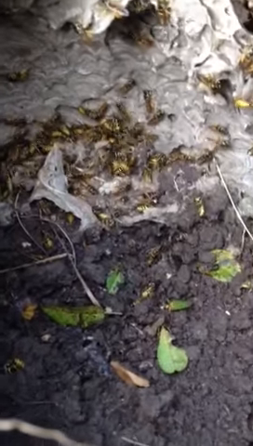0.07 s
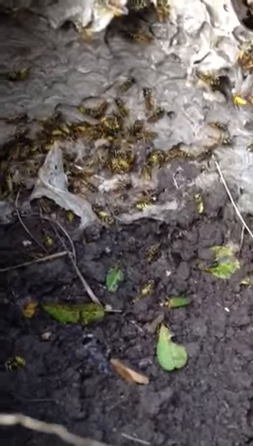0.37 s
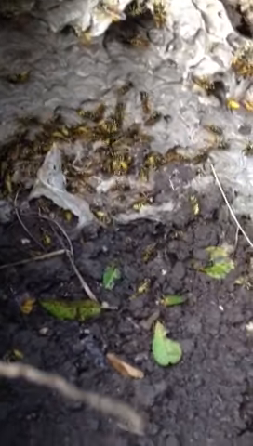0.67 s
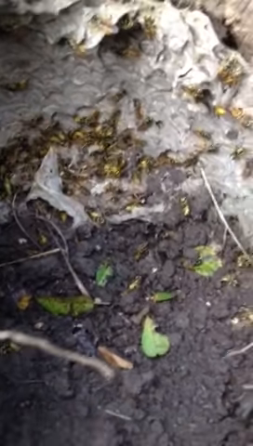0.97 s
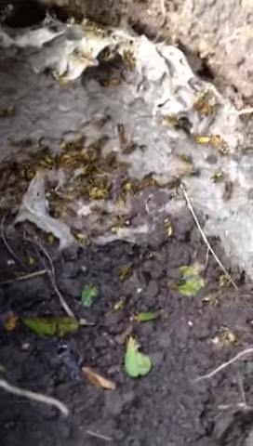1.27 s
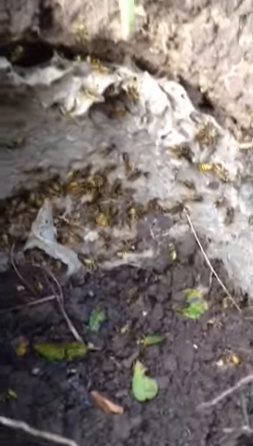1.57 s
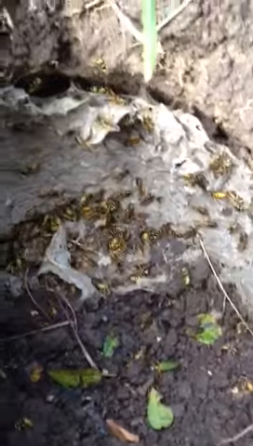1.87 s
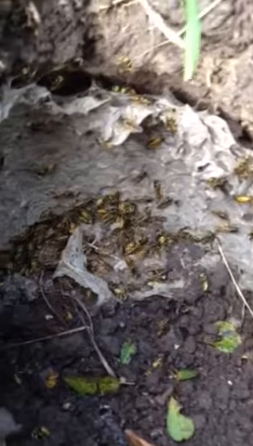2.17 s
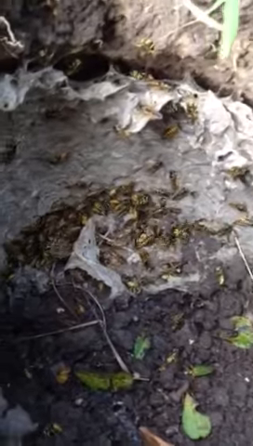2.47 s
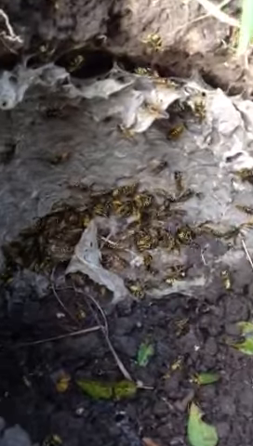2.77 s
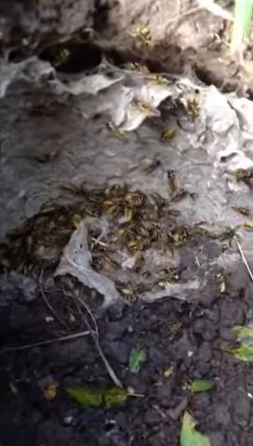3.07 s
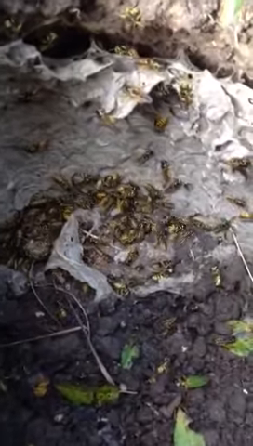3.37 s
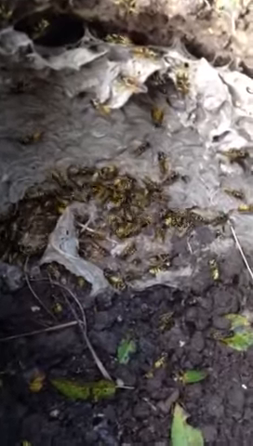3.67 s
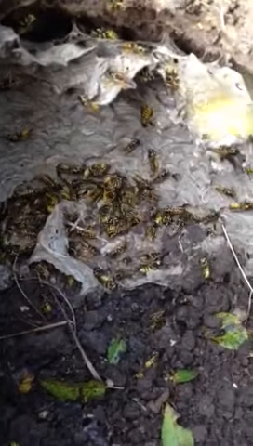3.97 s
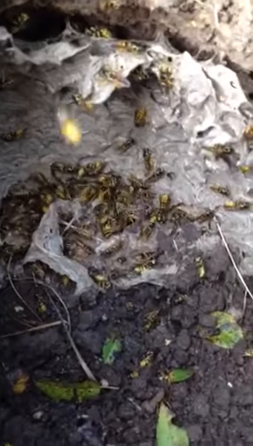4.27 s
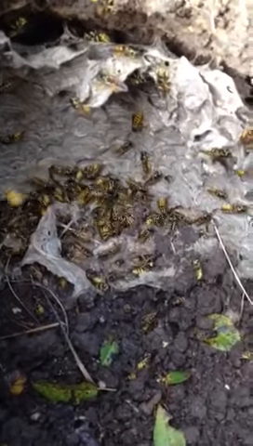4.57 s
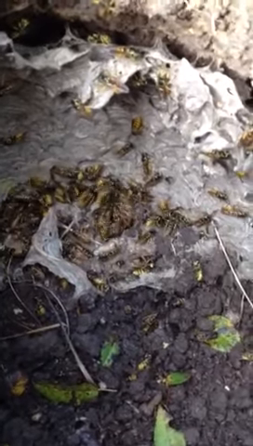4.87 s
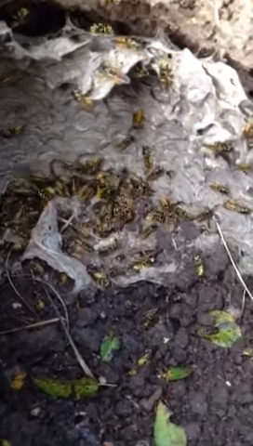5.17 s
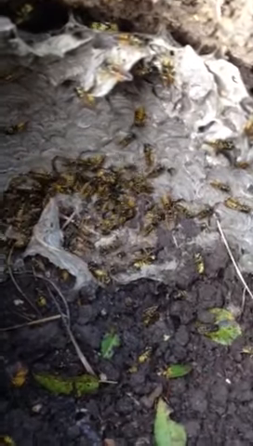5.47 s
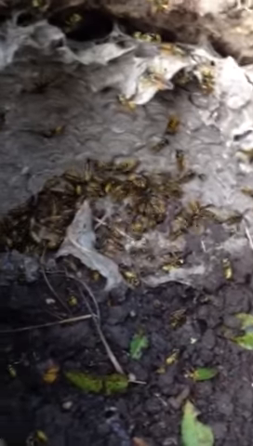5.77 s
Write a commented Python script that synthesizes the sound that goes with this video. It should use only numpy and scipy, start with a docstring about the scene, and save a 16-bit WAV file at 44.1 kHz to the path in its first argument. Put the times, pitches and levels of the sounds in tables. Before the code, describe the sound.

Wasps buzz around an open nest outdoors, with one sudden close pass, quieter hovering and tiny crawling ticks.

```python
"""Wasps buzz at an open paper nest in a hollow of soil, each wingbeat making low tones and a rasp.
One flies right past the microphone, fans it and seems to clip it with a wing; a second comes in
and hovers while others swerve by or land. Under them the colony hums, crawling wasps tick and rustle
on the paper, crumbs of soil drop on the nest, and thin falling chirps come from far off."""
import sys
import numpy as np
from scipy import signal
from scipy.fft import rfft, irfft, next_fast_len
from scipy.io import wavfile
from scipy.ndimage import uniform_filter1d, minimum_filter1d

SR = 44100
rng = np.random.default_rng(int(sys.argv[2]) if len(sys.argv) > 2 else 0)


def put_to_file(sound):
    """Save the sound as 16-bit audio at rate SR, in the file named by the first command-line argument."""
    columns = np.atleast_2d(sound).T  # one column per channel
    safe = np.clip(columns, -1, 1)
    whole_steps = np.round(safe * 32767)
    wavfile.write(sys.argv[1], SR, whole_steps.astype(np.int16))


N = 265041
T = np.arange(N) / SR

# Wing strokes per second, two to a wingbeat: time_s, stroke_hz
PASS_STROKES = [(0.0, 266.9), (0.066, 253.5), (0.12, 279.2), (0.194, 279.8), (0.308, 248.7), (0.354, 294.5),
                (0.386, 274.1), (0.522, 285.9), (0.642, 267.8), (0.776, 276.1), (0.986, 255.3),
                (1.056, 267.6), (1.09, 231.3), (1.228, 270.4), (1.4, 261.1)]
HOVER_STROKES = [(3.1, 270.1), (3.13, 271.9), (4.27, 272.6), (4.48, 278.6), (5.21, 276.7), (5.34, 264.9),
                 (5.43, 269.8), (5.94, 272.7), (6.0, 276.8)]
# Overtones of the wingbeat: multiple, level_db
PASS_OVERTONES = [(3, 2.5), (4, -8), (5, -1), (6, -2.5), (7, -1.5), (8, -5), (9, -10.5), (10, -11),
                  (11, -15), (12, -18.5), (13, -19.5), (14, -24), (15, -19)]
HOVER_OVERTONES = [(3, 1), (4, -11.5), (5, -11), (6, -12.5), (7, -15.5), (8, -12.5), (9, -15.5),
                   (10, -17.5), (11, -16.5), (12, -25), (13, -29)]
FLYBY_OVERTONES = [(3, 6), (4, 6), (5, 8.5), (6, 7), (7, 6), (8, -14), (9, 3), (10, -3), (11, 0), (12, -2),
                   (13, -22)]
# The passing wasp nears and leaves, its tone changing as it turns:
# time_s, stroke_db, beat_offset_db, treble_offset_db (offsets add to stroke_db)
APPROACH = [(0.0, -51, -36, -16), (0.068, -57, -6, -10.5), (0.124, -55, 6, 1), (0.326, -54.5, 4.5, -11),
            (0.392, -34, -8.5, -16), (0.433, -19, -5.5, -11.5)]
RETREAT = [(0.525, -17, -2.5, -19.5), (0.537, -32.5, 0, -13), (0.575, -49, 11.5, -5),
           (0.679, -43, -8.5, -13), (0.883, -57, -11.5, -9.5), (0.941, -65, -3, -7.5), (1.075, -64, -9, -6),
           (1.125, -74, 1.5, -16.5), (1.255, -63.5, -31, -8.5), (1.41, -72, -12, -4)]
# The tone of each noise, from low to high: frequency_hz, relative_db
EDDY_SPECTRUM = [(80, -32.5), (160, -3), (330, 0.5), (600, -0.5), (1000, -5), (1500, -15.5), (3000, -41.5)]
RASP_SPECTRUM = [(700, -15.5), (1500, -1.5), (2100, 2), (3000, -4), (4500, -10.5), (7500, -15.5),
                 (10000, -25), (15000, -27.5)]
RUSTLE_SPECTRUM = [(700, -21.5), (1800, -6), (4000, -0.5), (7000, -5), (9700, -11), (13000, -7.5),
                   (15000, -11)]
AIR_SPECTRUM = [(25, -10.5), (70, -15), (105, -4), (150, -4.5), (220, -1.5), (350, -5.5), (600, -9),
                (1300, -11.5), (2500, -16), (4800, -19.5), (7400, -14.5), (9700, -26), (12500, -18),
                (15000, -14)]
TICK_SPECTRUM = [(300, -9.5), (1500, -5.5), (3500, 1.5), (5000, -7.5), (7000, 1.5), (9500, -6),
                 (14000, 3.5)]
GUST_SPECTRUM = [(25, -36.5), (80, -39.5), (125, -12), (170, 10), (230, 1), (330, -1.5), (480, 2),
                 (800, -7.5), (1300, -23.5), (2000, -27), (4000, -46.5), (15000, -72.5)]
SWISH_SPECTRUM = [(300, -5), (1500, -1.5), (3000, -3.5), (5000, -8.5), (7700, -4), (10000, -13.5),
                  (15000, -9.5)]
# Wasps fanning inside the nest: pitch_hz, level_db
COLONY_HUMS = [(147.46, -85), (149.3, -85), (156, -75.5), (175.3, -75.5), (132, -80)]
# Faint chirps: start_s, level_db
CHIRPS = [(0.018, -64.5), (.125, -61.5), (.21, -65), (.295, -63), (0.824, -68.5), (.992, -69.5),
          (2.492, -60.5), (2.579, -65), (2.703, -67.5), (2.99, -70), (3.15, -68.5)]
# Legs and jaws on paper: start_s, peak_db, body_boost_db, treble_boost_db, decay_s
TICKS = [(1.0955, -41.5, -6, -1, 0.046), (1.2162, -34, 0, -1.5, 0.013), (1.7255, -44.5, -14.5, -0.5, 0.016),
         (1.735, -45, -13.5, -8.5, 0.02), (2.1008, -39, -2.5, 4, 0.011), (2.448, -44, -9, -4.5, .035),
         (3.7562, -44.5, -14.5, -8, 0.024), (4.2264, -48.5, 6, -13, 0.028), (4.6523, -47.5, -17, -5, 0.036),
         (5.8751, -36.5, 10, 2.5, 0.012)]
# Gusts off the wings: closest_s, passing_s, gust_db, swish_db
GUSTS = [(.48, 0.032, -10.5, -41.5), (3.34, 0.13, -71, -62)]
# Crumbs landing: start_s, peak_db, decay_s
CRUMBS = [(1.431, -44.5, 0.022), (1.578, -57.5, 0.011), (1.873, -58.5, 0.045), (2.868, -53, 0.045),
          (3.796, -54.5, 0.027)]
# Notes the hollow nest rings at: pitch_hz, relative_db
NEST_NOTES = [(1440, 1), (1530, -3), (1720, -5), (1870, -2), (3000, -13.5)]
# How loud the hovering wasp is: time_s, stroke_db
HOVER_LEVELS = [(2.9, -82), (2.96, -68.5), (3.12, -76), (3.22, -55), (3.43, -44.5), (3.58, -57.5),
                (4.31, -53), (5.43, -62.5), (5.68, -59.5), (6.0, -61.5)]
# Two wasps swerve by, one slows its wings to land: closest_s, passing_s, level_db, stroke_hz,
# glide_hz_per_s, spurt_hz, beat_offset_db, drone_offset_db, jitter_fraction
FLYBYS = [(3.405, 0.068, -50, 270.5, 170, 17, -9.5, -4.5, 0.03),
          (3.52, .08, -58.5, 262.6, -170, 12, -2.5, 2.5, .01),
          (5.72, .09, -62, 243.8, -245, 1, -16, -11, 0.01)]


def undb(db):
    """Turn decibels into gain."""
    return np.exp(np.log(10) / 20 * np.asarray(db))


def unit(x):
    """Scale to an average (rms) level of 1."""
    return x / np.sqrt(np.mean(x ** 2))


def curves(table, t):
    """Each column of a table at times t, joined by straight lines."""
    times, *columns = np.transpose(table)
    return [np.interp(t, times, column) for column in columns]


def colour(x, spectrum):
    """Filter a sound by a spectrum table; the result has level 1."""
    hz, db = np.transpose(spectrum)
    size = next_fast_len(len(x) + 2048)
    bin_hz = np.arange(size // 2 + 1) * SR / size
    gain = undb(np.interp(np.log(bin_hz + 1), np.log(hz), db))
    return unit(irfft(rfft(x, size) * gain, size)[:len(x)])


def drift(rate, t):
    """A smooth random wiggle of size near 1, with about `rate` turns a second."""
    turns = signal.resample(rng.standard_normal(1024), 8192)
    return np.interp(t * rate, np.arange(8192) / 8, turns)


def add(out, start_s, x):
    """Mix a short sound in."""
    i = int(start_s * SR)
    out[i:i + len(x)] += x[:N - i]


def decay(t, decay_s):
    """Die away by 60 dB in decay_s."""
    return np.exp(-np.log(1000) * t / max(decay_s, .002))


def during(start_s, end_s):
    """Sample times from start to end."""
    return T[(T >= start_s) & (T <= end_s)]


def click(spectrum, decay_s, peak_db):
    """A burst of noise that dies away fast."""
    burst = colour(rng.standard_normal(4096) * decay(T[:4096], decay_s), spectrum)
    return burst / abs(burst).max() * undb(peak_db)


def wings(t, stroke_hz, stroke_db, beat_db, drone_db, whine_db, rasp_db,
          overtones, jitter, scatter, puff_db, eddy_db):
    """Beating wings make two low tones, a buzz of overtones and a rasp as they flip over."""
    out = np.zeros(N)
    phase = 2 * np.pi * np.cumsum(stroke_hz / 2 * (1 + jitter * drift(70, t))) / SR
    tones = np.sqrt(2) * (undb(beat_db) * np.cos(phase) + undb(stroke_db) * np.cos(2 * phase))
    # echoes off the soil change with every move, so each overtone swells and shifts on its own
    waves = [undb(db + 2.5 * drift(12, t)) * np.cos(multiple * phase + scatter * drift(14, t))
             for multiple, db in overtones]
    buzz = undb(drone_db) * unit(sum(waves[:3])) + undb(whine_db) * unit(sum(waves[3:]))
    # swirls of air (eddies) from every beat roughen the buzz
    pulse = np.exp(np.cos(phase))
    buzz += undb(drone_db + eddy_db) * colour(rng.standard_normal(len(t)) * pulse, EDDY_SPECTRUM)
    # each flip comes a little early or late and has its own force
    flip_count = np.floor((phase + .017 * drift(140, t)) / (2 * np.pi))
    snap = colour(np.diff(flip_count, prepend=0) * undb(2 * drift(120, t)), RASP_SPECTRUM)
    puff = colour(rng.standard_normal(len(t)) * pulse, RASP_SPECTRUM)
    rasp = undb(rasp_db) * unit(snap + undb(puff_db) * puff)
    fade = np.clip(np.minimum(t - t[0], t[-1] - t) / .01, 0, 1)
    add(out, t[0], fade * (tones + buzz + rasp))
    return out


def passing_wasp(jet_start_s=.4445, jet_end_s=.5125, edge_s=.001):
    """A wasp sweeps the microphone with the jet of air under its wings, then wanders off."""
    t = during(0, RETREAT[-1][0] + .05)
    stroke_hz, = curves(PASS_STROKES, t)
    stroke_db, beat_offset_db, treble_offset_db = curves(np.vstack([APPROACH, RETREAT]), t)
    in_jet = (np.tanh((t - jet_start_s) / edge_s) - np.tanh((t - jet_end_s) / edge_s)) / 2
    buzz_db = stroke_db + 9.5 * in_jet
    low_db = buzz_db + 20 * np.log10(np.hypot(1, undb(beat_offset_db)))  # follows both low tones
    high_db = buzz_db + treble_offset_db
    head_on_db = 9 * np.exp(-((t - .42) / .023) ** 2)  # the wings snap hardest head on
    return wings(t, stroke_hz, stroke_db + 10.5 * in_jet,
                 beat_db=stroke_db + beat_offset_db + 4.5 * in_jet,
                 drone_db=low_db - 9, whine_db=high_db - 2.5, rasp_db=high_db + head_on_db - 15,
                 overtones=PASS_OVERTONES, jitter=.006, scatter=.55, puff_db=-8, eddy_db=-17)


def colony(second_db=-6, third_db=-13, wander=.12):
    """Wasps inside the nest hum at wandering pitches, muffled by the paper."""
    out = 0
    for hz, db in COLONY_HUMS:
        phase = 2 * np.pi * np.cumsum(hz * (1 + wander * drift(20, T))) / SR
        hum = np.cos(phase) + undb(second_db) * np.cos(2 * phase) + undb(third_db) * np.cos(3 * phase)
        out += unit(hum) * undb(db + 3.9 * drift(5, T))
    return out


def rustle(level_db=-74, surge_db=7.5, grain_db=2.5):
    """Many legs scrape the paper in uneven surges."""
    scrape = colour(rng.standard_normal(N), RUSTLE_SPECTRUM)
    return scrape * undb(level_db + surge_db * np.tanh(drift(3.7, T)) + grain_db * drift(96, T))


def outdoor_air(level_db=-63.5):
    """Still air makes a soft, nearly steady hush."""
    return colour(rng.standard_normal(N), AIR_SPECTRUM) * undb(level_db + .5 * drift(1.2, T))


def chirps(start_hz=7100, end_hz=5300, length_s=.036, blur_hz=800):
    """Short falling notes, probably a small bird, blurred by distance."""
    out, t = np.zeros(N), T[:int(length_s * SR)]
    phase = 2 * np.pi * np.cumsum(np.linspace(start_hz, end_hz, len(t))) / SR
    swell = np.sin(np.pi * (t / length_s) ** .67)
    lowpass = signal.butter(2, blur_hz, fs=SR)
    for start_s, db in CHIRPS:
        blur = signal.lfilter(*lowpass, rng.standard_normal((2, 4096)))[:, :len(t)]
        chirp = unit(blur[0] * np.cos(phase) + blur[1] * np.sin(phase))
        add(out, start_s, chirp * swell * undb(db))
    return out


def crawling(step_db=-63, spread_db=8, steps=130):
    """Legs and jaws tick on the paper over a patter of tiny steps."""
    out = np.zeros(N)
    for start_s, peak_db, body_db, treble_db, decay_s in TICKS:
        spectrum = [(hz, db + body_db * (hz < 3000) + treble_db * (hz > 9000))
                    for hz, db in TICK_SPECTRUM]
        add(out, start_s, click(spectrum, decay_s, peak_db))
    for when, size in rng.random((steps, 2)):
        add(out, when * T[-1], click(TICK_SPECTRUM, decay_s=.015, peak_db=step_db + spread_db * size ** 3))
    return out


def wing_gusts():
    """Air thrown off the wings swishes, and its narrow jet hits the microphone up close."""
    out = 0
    for closest_s, passing_s, gust_db, swish_db in GUSTS:
        away = (T - closest_s) / passing_s
        gust = colour(rng.standard_normal(N), GUST_SPECTRUM) * undb(gust_db) * np.exp(-away ** 2)
        swish = colour(rng.standard_normal(N), SWISH_SPECTRUM) * undb(swish_db) / (1 + away ** 2)
        out += gust + swish
    return out


def wing_touch(start_s=.4905):
    """One hard snap, probably a wing tip clipping the microphone."""
    out = np.zeros(N)
    add(out, start_s, click(RASP_SPECTRUM, decay_s=.014, peak_db=-17))
    return out


def crumbs():
    """Falling crumbs of soil make the paper shell ring briefly."""
    out, t = np.zeros(N), T[:4096]
    onset = np.minimum(t / .002, 1)  # a crumb is soft: the blow takes a moment
    for start_s, peak_db, decay_s in CRUMBS:
        notes = sum(undb(db) * np.sin(2 * np.pi * (hz * t + rng.random())) for hz, db in NEST_NOTES)
        ring = notes * decay(t, decay_s) * onset
        add(out, start_s, ring / abs(ring).max() * undb(peak_db))
    return out


def hovering_wasp(hold_db=-54, wobble=.0021, sway_db=5):
    """A wasp wobbles in close, then hangs before the nest, swaying a little."""
    t = during(HOVER_LEVELS[0][0], T[-1])
    stroke_hz, = curves(HOVER_STROKES, t)
    stroke_db, = curves(HOVER_LEVELS, t)
    near_db = stroke_db - hold_db
    stroke_hz *= 1 + wobble * np.maximum(near_db, 0) * drift(15, t)
    beat_db = stroke_db - 15.5 + sway_db * drift(6, t)
    swell_db = .71 * near_db  # close up, the treble grows less than the low tones
    return wings(t, stroke_hz, stroke_db, beat_db,
                 drone_db=swell_db - 64, whine_db=swell_db - 71, rasp_db=swell_db - 75,
                 overtones=HOVER_OVERTONES, jitter=.00895, scatter=1, puff_db=23, eddy_db=-8.5)


def flybys():
    """Wasps swell and fade with distance; their pitch glides and spurts up at the turn."""
    out = 0
    for closest_s, passing_s, db, hz, glide, spurt_hz, beat_offset_db, drone_offset_db, jitter in FLYBYS:
        t = during(closest_s - 3 * passing_s, closest_s + 3 * passing_s)
        nearness = 1 / (1 + ((t - closest_s) / passing_s) ** 2)
        stroke_hz = hz + glide * (t - closest_s) + spurt_hz * nearness
        stroke_db = db + 20 * np.log10(nearness)
        drone_db = stroke_db + drone_offset_db
        out += wings(t, stroke_hz, stroke_db, stroke_db + beat_offset_db, drone_db,
                     whine_db=drone_db - 8, rasp_db=drone_db - 12,
                     overtones=FLYBY_OVERTONES, jitter=jitter, scatter=.9, puff_db=0, eddy_db=-14)
    return out


def scene():
    """The flying wasps over the quiet sounds around the nest, in mono."""
    flyers = passing_wasp() + hovering_wasp() + flybys() + wing_gusts() + wing_touch()
    return (flyers + outdoor_air() + colony() + crawling() + rustle() + crumbs() + chirps())[None]


def record(dry):
    """Cut the rumble, turn down the loudest wingbeats with a limiter, and cut the highest treble."""
    bottom_hz, top_hz = 85, 15350
    hold_samples, ceiling = int(.011 * SR), .98
    thin = signal.sosfilt(signal.butter(4, bottom_hz, "high", fs=SR, output="sos"), dry)
    safe_gain = ceiling / np.maximum(abs(thin), ceiling)
    smooth_gain = uniform_filter1d(minimum_filter1d(safe_gain, hold_samples), hold_samples)
    return signal.sosfilt(signal.ellip(10, .2, 80, top_hz, fs=SR, output="sos"), thin * smooth_gain)


dry = scene()
out = record(dry)
put_to_file(out)
```